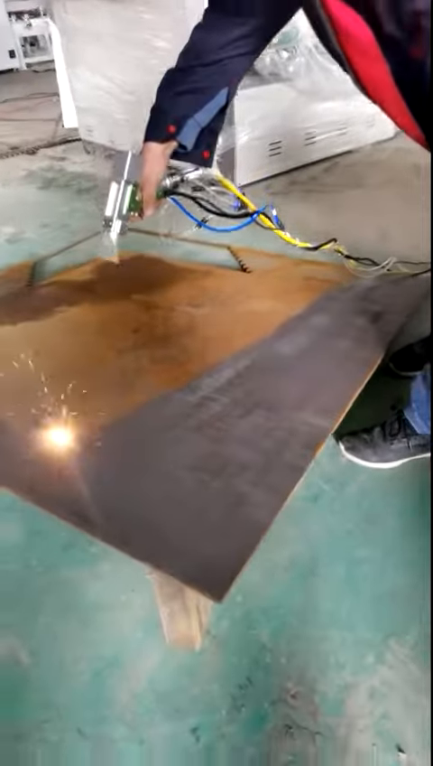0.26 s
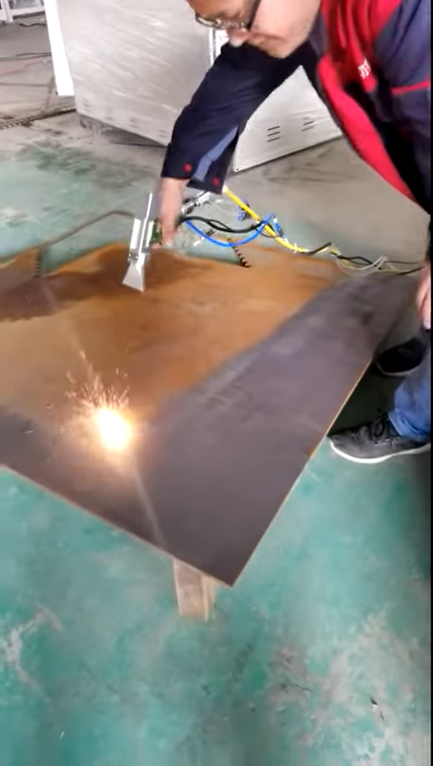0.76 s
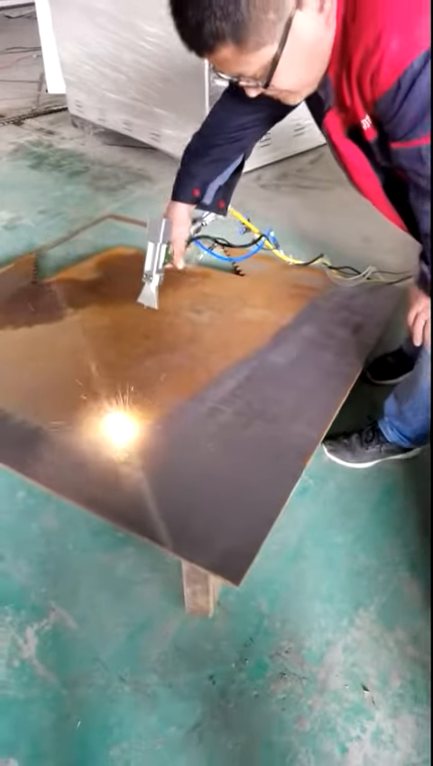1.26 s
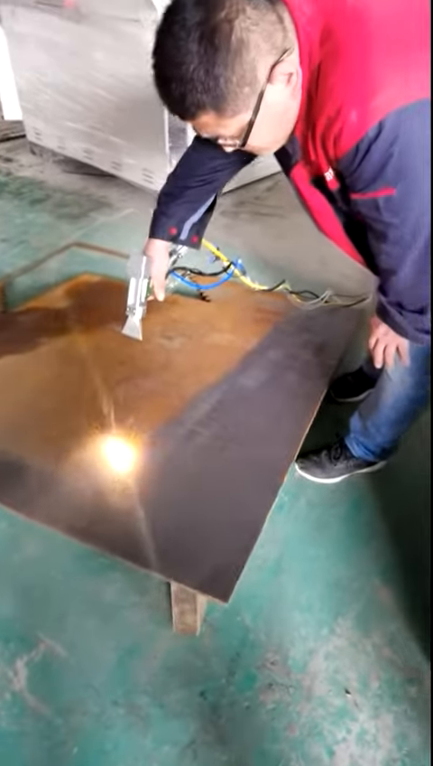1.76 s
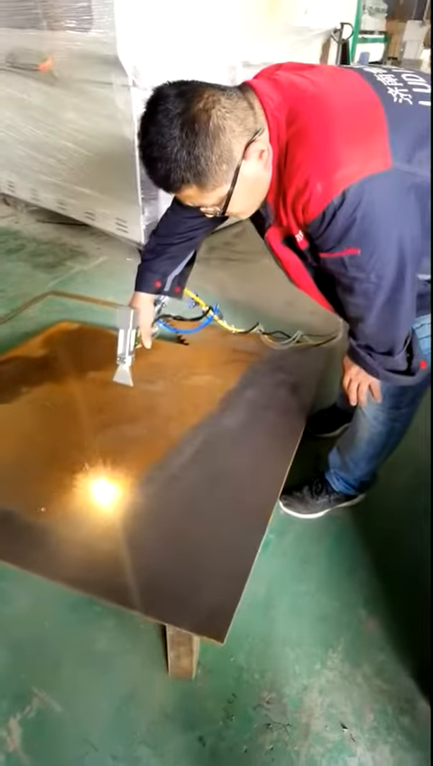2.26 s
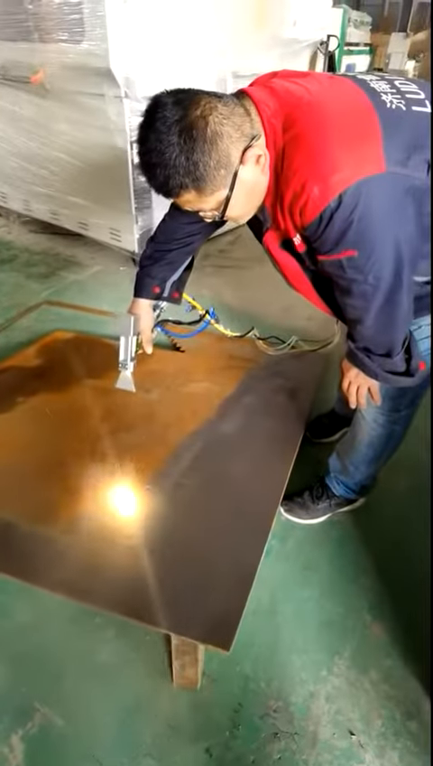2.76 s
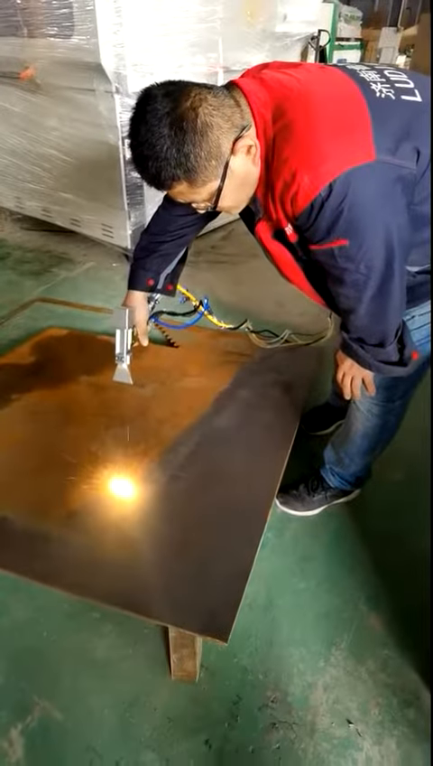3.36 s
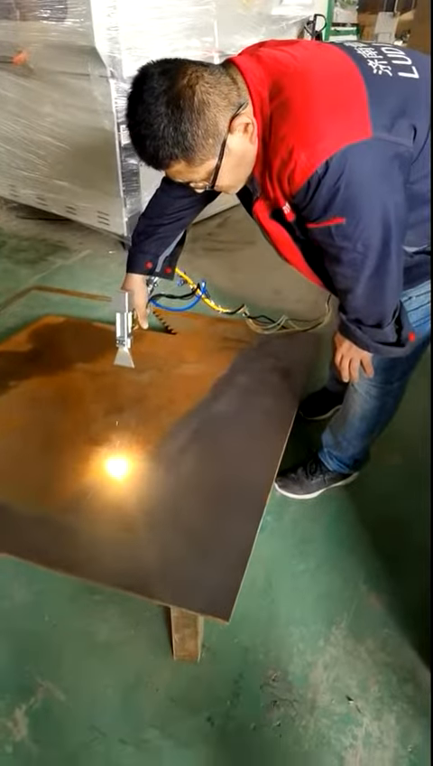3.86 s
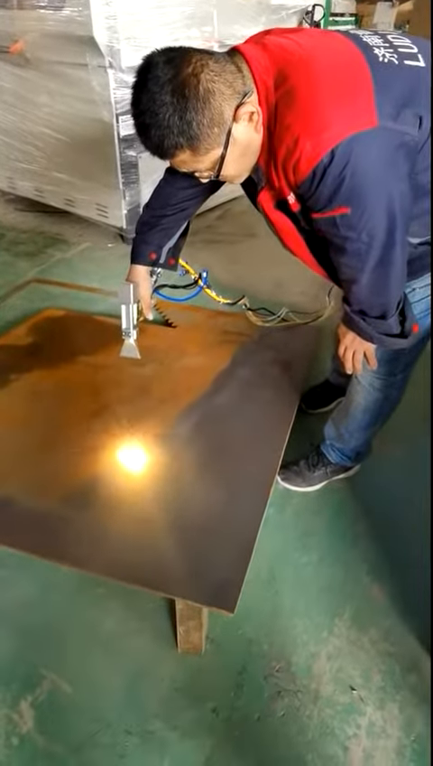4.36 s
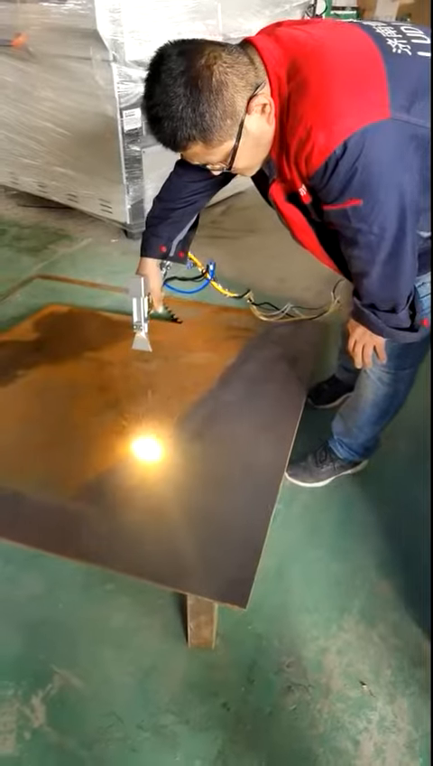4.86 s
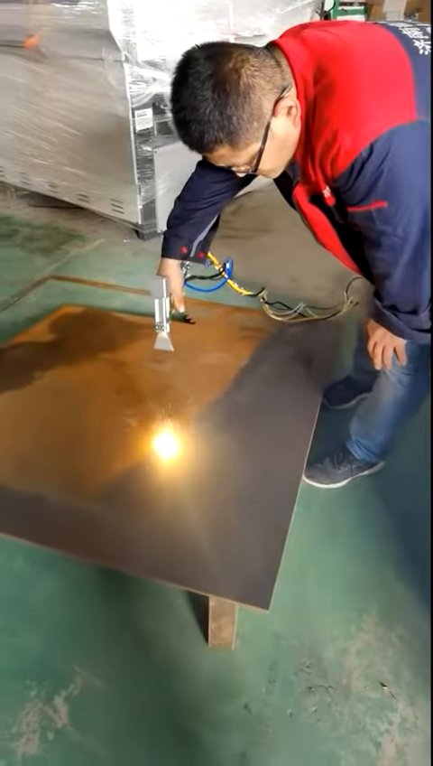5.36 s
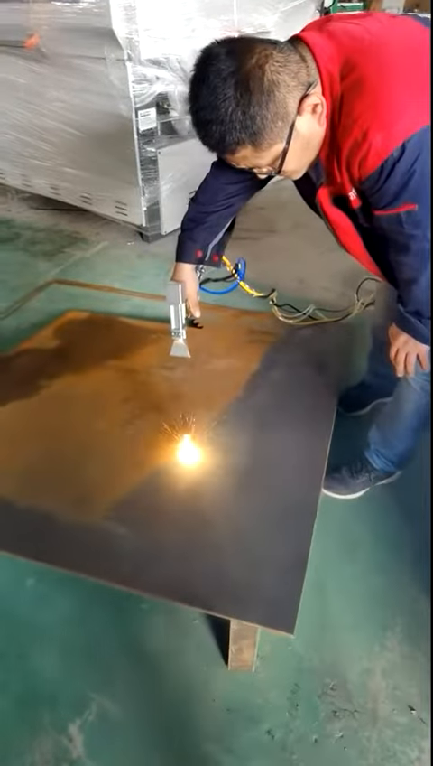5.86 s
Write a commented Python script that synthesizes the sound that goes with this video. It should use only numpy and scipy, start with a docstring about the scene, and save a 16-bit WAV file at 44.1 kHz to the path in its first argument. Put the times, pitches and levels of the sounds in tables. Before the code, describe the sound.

Close by, rust fizzes and hisses without pause as a handheld laser sweeps over a steel plate, along with a high, fast-fluttering whine. About halfway through, the sizzle eases slightly and the whine stands out more. A low power supply hum and the soft rumble of factory ventilation continue behind it, and a handful of quiet, dull knocks pass beneath the hiss.

```python
"""In a factory hall, a handheld laser cleaner strips rust from a steel plate.
The beam scans the plate about 2000 times a second, which whines; the spot also sweeps to and fro
about 25 times a second, so the whine warbles. Rust turning to vapour fizzes and hisses in drifting
bands. Below lie a mains hum, the hall's ventilation, patchy low noise and a few soft, dull knocks."""
import sys
import numpy as np
from scipy import signal
from scipy.fft import rfft, irfft, next_fast_len
from scipy.io import wavfile
from scipy.ndimage import uniform_filter1d

SR = 44100
rng = np.random.default_rng(int(sys.argv[2]) if len(sys.argv) > 2 else 0)


def bounce(signal):
    """Save signal as a 16-bit WAV file at the path given by the first command-line argument."""
    frames = np.transpose(np.atleast_2d(signal))
    limited = np.clip(frames, -1, 1)
    pcm = np.round(limited * 32767).astype(np.int16)
    wavfile.write(sys.argv[1], SR, pcm)


N = 269010
TIME = np.arange(N) / SR
# hiss is drawn on a grid of short moments (frames) and frequencies (bins)
FRAME_S = np.arange(N // 256 + 5) * 256 / SR
BIN_HZ = np.fft.rfftfreq(1024, 1 / SR)
SCAN_HZ, SWEEP_HZ, MAINS_HZ = 2000.85, 24.976, 99.95

# the sound sags at both turns of the sweep: time_s, far_depth, near_depth (both 0-1)
TURN_SAGS = [(0, .38, .28), (2, .43, .3), (3, .48, .22), (4.6, .52, .27), (5.1, .6, .2), (5.45, .78, .06),
             (6.1, .74, .07)]
# the whine's three main harmonics as gun and listener move: time_s, first_db, second_db, third_db
WHINE_LEVELS = [(0, -39.5, -40, -41), (.25, -41, -43, -33.5), (.5, -45, -34, -36), (.65, -37, -37.5, -40),
                (.85, -41, -32.5, -34), (1.08, -37.5, -30, -39), (1.22, -37, -35, -26),
                (1.45, -34.5, -35, -38), (1.6, -36, -39, -34), (1.8, -48, -28.5, -34), (2, -37, -36, -36),
                (2.22, -34, -36.5, -31.5), (2.42, -34.5, -42, -38), (2.55, -31.5, -38, -34),
                (2.75, -33.5, -35, -34), (2.95, -33, -35, -33), (3.15, -32.5, -30.5, -34),
                (3.7, -33, -31, -33), (4.15, -33.5, -36, -39.5), (4.47, -32.5, -35, -29.5),
                (4.6, -32.5, -36, -37), (4.78, -31.5, -34.5, -29.5), (4.92, -31, -36.5, -31.5),
                (5.05, -31.5, -34.5, -28.5), (5.25, -30.3, -33.5, -32.5), (5.45, -34, -32, -32.5),
                (5.65, -29.5, -29, -34.5), (5.76, -32, -35.5, -35.5), (5.97, -29, -30.5, -34),
                (6.1, -31, -43, -33)]
# faint high tones of the whine: harmonic, level_db
WHINE_OVERTONES = [(4, -57), (6, -60)]
# tone colour of the fizz: pitch_hz, loose_rust_db, bare_steel_db
FIZZ_COLOURS = [(705, -50, -45), (1010, -23, -3), (1370, -9.5, 0), (1700, -4, -1), (2260, -1, 2.5),
                (2530, -3.5, -2), (2850, 1, -2), (3100, -2.5, 0.5), (3490, -0.5, 1.5), (4370, 1.5, 3.5),
                (4700, -2, -4), (5150, -3.5, -1.5), (5600, 1.5, -1), (7250, -0.5, -6), (9100, -2.5, 0),
                (9600, -2.5, -11.5), (9600, 0, -9), (11110, -2, -3), (11700, -7.5, -11),
                (13660, -13.5, -19), (15000, -58, -40)]
# the fizz thins as loose rust burns off: time_s, level_db, treble_lift_db, bare_share (0-1)
FIZZ_CHANGES = [(0, -30.5, -1, 0.37), (.6, -30.5, -3.5, 0), (1.5, -30, -6, 0.1), (2.1, -32, -1.5, 0.3),
                (2.7, -32.5, -0.5, 0.36), (3.3, -34, -1, 0.98), (4.4, -34.5, 0.5, 0.9),
                (5.1, -34.5, -2, 0.9), (5.6, -33.5, 0.5, 0.77), (6, -30, -9, 0.1)]
# how hard the rust boils away, heard in the hiss bands: time_s, level_db
BAND_LEVELS = [(0, -28.5), (0.35, -30), (0.8, -25.5), (1.15, -25), (1.32, -27.5), (1.65, -25), (1.92, -25),
               (2.22, -25.5), (2.6, -29), (3.0, -28), (3.5, -34.5), (3.75, -30), (4.18, -32), (4.45, -31),
               (5.1, -32), (5.62, -34), (6.1, -30.5)]
# the bands glide as the gun settles, then drift with its aim: time_s, lower_hz, upper_hz
BAND_CENTRES = [(0, 3550, 6620), (.19, 3810, 6630), (.35, 3660, 6730), (.6, 3820, 6620), (1.1, 3810, 6530),
                (1.58, 3760, 6480), (1.86, 3840, 6620), (2.12, 3805, 6560), (2.75, 3880, 6730),
                (3.45, 3920, 6750), (3.64, 3750, 6470), (5.3, 3970, 6490), (5.6, 4070, 6530),
                (5.8, 3970, 6670), (6.1, 3800, 6600)]
# a well-focused beam gives narrow bands: time_s, width_factor, lower_bands_db
BEAM_FOCUS = [(0, 1, -5.5), (.35, 1.04, -1.5), (.8, 1.1, -3.5), (1.6, 0.96, -3), (1.92, 0.79, -8.5),
              (2.17, 1, -4.5), (2.6, 0.72, -8), (3.3, 0.9, -8), (4.4, 1.16, -14), (5.3, 1.5, -6),
              (6.1, 1.1, -7.5)]
# a narrow cut between upper band and whine (a boost if negative): time_s, pitch_hz, depth_db
BAND_NOTCH = [(0, 5860, -9), (.6, 6360, -4), (1.2, 6400, 15), (2.3, 6230, -5), (2.9, 6230, 7),
              (3.35, 6400, -3), (3.65, 5700, -3), (6.1, 5900, 14)]
# weak resonances that come and go, one list each: time_s, centre_hz, relative_db
WEAK_BANDS = [
    [(0, 4310, -5), (.2, 4200, -4.5), (.45, 3950, -3), (.8, 3900, -36)],
    [(0, 6330, -8), (.15, 6220, -7), (.35, 6060, -14), (.65, 5950, -40)],
    [(0, 7340, -14), (.45, 7200, -11), (.9, 7360, -22), (1.4, 7300, -17), (2.1, 7260, -13),
     (2.6, 7200, -27), (3.5, 7040, -3), (3.9, 7320, -18), (5.4, 7100, -14), (6.1, 7100, -3)],
    [(0, 8700, -22), (2.4, 8460, -21), (2.9, 8700, -15.5), (4.3, 8870, -14.5), (5.3, 9000, -28),
     (5.8, 9040, -11), (6.1, 8900, -8)],
]
# the hiss drops away for a split second: middle_s, half_length_s, depth_db
HISS_DIPS = [(0.482, 0.004, 20), (1.3, 0.022, 2), (1.955, .007, 5), (4.924, 0.008, 10), (5.568, 0.0065, 15),
             (6.012, .0055, 10), (6.057, 0.0055, 10)]
# hum of the laser's power supply: harmonic, level_db
HUM_HARMONICS = [(1, -40.5), (2, -56), (3, -79)]
# tone colour of the ventilation's rumble: pitch_hz, level_db
RUMBLE_COLOUR = [(15,5.5),(30,-6),(60,5),(110,6.5),(180,3),(250,-2.5),(350,-54),(800,-51)]
# tone colours of the low and the mid background noise: pitch_hz, level_db
LOW_COLOUR = [(100,-14),(200,-17),(290,4.5),(360,-3.5),(430,0),(520,1),(900,-15.5)]
MID_COLOUR = [(300,-41),(420,-54),(520,6.5),(640,13.5),(760,10),(900,1.5),(1150,12),(1700,-7),(4000,-37)]
# background noise with brief gaps that are shallower later on: time_s, mid_db, low_db, gap_depth_db
BACKGROUND_LEVELS = [(0, -47.5, -51.5, 15), (.8, -47.5, -64.5, 26), (1.15, -45, -44.5, 9),
                     (1.6, -45.5, -57, 23), (1.95, -45.5, -50.5, 14), (2.6, -45, -55, 25),
                     (3.3, -45, -48, 3), (4.1, -46, -49.5, 7), (5.1, -46.5, -47, 2), (5.75, -42, -47, 3),
                     (6.1, -46, -43, 6)]
# soft knocks under the sizzle: start_s, level_db
KNOCK_HITS = [(.478, -35.5), (1.948, -36), (2.313, -43), (2.946, -39), (4.928, -35)]
# the tones a knock rings with: pitch_hz, level_db, ring_s (time to fade by 60 dB)
KNOCK_TONES = [(115, -9, 0.047), (232, -3, 0.065), (335, -4.5, 0.073), (477, -12, 0.057), (820, -7, .04)]


def gain_of(db):
    """Turns decibels into a gain to multiply by."""
    return 10 ** (np.asarray(db) / 20)


def evened(x):
    """Scales a signal to an average strength (rms) of one."""
    return x / np.sqrt(np.mean(abs(x) ** 2) + 1e-20)


def follow(rows, at=TIME):
    """Joins a table's rows with straight lines: one curve for each column after time."""
    time_s, *columns = np.transpose(rows)
    return [np.interp(at, time_s, column) for column in columns]


def colour_gain(points, hz):
    """Gain at each frequency, read from (pitch_hz, level_db) points."""
    pitch_hz, level_db = np.transpose(points)
    return gain_of(np.interp(np.log(hz + 1), np.log(pitch_hz), level_db))


def filtered_noise(gain_at):
    """Steady noise, shaped by a function that gives each frequency a gain."""
    size = next_fast_len(N)
    hz = np.fft.rfftfreq(size, 1 / SR)
    return evened(irfft(rfft(rng.standard_normal(size)) * gain_at(hz), size)[:N])


def wander(rate_hz):
    """A random wobble, mostly slower than the given rate."""
    return filtered_noise(lambda hz: 1 / (1 + (hz / rate_hz) ** 2))


def patches(span_s, span_hz):
    """Random blotches over time and frequency."""
    field = rng.standard_normal((len(FRAME_S), len(BIN_HZ)))
    field = uniform_filter1d(field, max(1, round(span_s / FRAME_S[1])), axis=0)
    return evened(uniform_filter1d(field, max(1, round(span_hz / BIN_HZ[1])), axis=1))


def hiss(shape, patch_db):
    """Noise that follows a grid of gains (frames by bins), louder and softer in patches."""
    real, imag = rng.standard_normal((2, *shape.shape))
    spectra = (real + 1j * imag) * shape * gain_of(patch_db * patches(span_s=.25, span_hz=220))
    return evened(signal.istft(spectra.T, nperseg=1024, noverlap=768)[1][:N])


def sweep(lag_cycles=.14):
    """Where the spot is in its to-and-fro cycle, as an angle: zero at the far turn."""
    return 2 * np.pi * (SWEEP_HZ * TIME - lag_cycles)


def throb(share):
    """The level sags broadly at the sweep's far turn and briefly at the near turn."""
    far, near = follow(TURN_SAGS)
    place = np.cos(sweep())
    sag = far * np.exp(1.8 * (place - 1)) + near * np.exp(-8 * (place + 1))
    return evened(1 - share * sag)


def scan_tone(harmonic, swing_rad=.44, roughness=.23, rough_hz=60, waver_db=.75):
    """One tone of the whine; the sweeping spot moves nearer and farther, so it warbles."""
    travel = swing_rad * (np.cos(sweep()) + .3 * np.cos(2 * sweep()))
    # uneven rust roughens the higher tones most
    patchy = 1 + roughness * max(1, (harmonic / 2) ** 2) * (wander(rough_hz) + 1j * wander(rough_hz))
    angle = harmonic * (2 * np.pi * SCAN_HZ * TIME + travel) + 2 * np.pi * rng.random()
    tone = evened((patchy * np.exp(1j * angle)).real)
    return gain_of(waver_db * wander(4)) * tone * throb(1 if harmonic < 3 else .7)


def whine():
    """The scanning beam sings at whole multiples of its rate: three strong, two faint."""
    harmonics = [*enumerate(follow(WHINE_LEVELS), 1), *WHINE_OVERTONES]
    return sum(gain_of(db) * scan_tone(round(harmonic)) for harmonic, db in harmonics)


def fizz(flicker_db=1.93, grain_db=2.4):
    """Broad, grainy hiss, full over loose rust and hollower over bare steel; its treble flickers."""
    pitch_hz, *colours = np.transpose(FIZZ_COLOURS)
    loose_db, bare_db = (np.interp(np.log(BIN_HZ + 1), np.log(pitch_hz), db) for db in colours)
    _, lift_db, bare_share = follow(FIZZ_CHANGES, FRAME_S)
    treble = np.clip((BIN_HZ - 5000) / 5000, 0, 2)
    shape_db = loose_db + np.outer(bare_share, bare_db - loose_db)
    shape_db += np.outer(lift_db, np.minimum(treble, 1))
    shape_db += flicker_db * treble * patches(.045, 350)
    shape_db += grain_db * np.minimum(patches(.05, 170), 1.2)
    return gain_of(follow(FIZZ_CHANGES)[0]) * hiss(gain_of(shape_db), patch_db=1.86)


def hiss_band(centre_hz, core_hz, skirt_hz, skirt_db, notch_width_hz=44):
    """A resonance: a narrow core of hiss in a wide, softer skirt. It widens as focus is lost."""
    width = follow(BEAM_FOCUS, FRAME_S)[0]
    offset = (BIN_HZ - centre_hz[:, None]) / width[:, None]
    core = np.exp(-(offset / core_hz) ** 2)
    skirt = gain_of(skirt_db) ** 2 / (1 + (offset / skirt_hz) ** 2) ** 3
    power = core + skirt
    notch_hz, depth_db = (curve[:, None] for curve in follow(BAND_NOTCH, FRAME_S))
    notch = gain_of(-depth_db * np.exp(-((BIN_HZ - notch_hz) / notch_width_hz) ** 2))
    return hiss(notch * np.sqrt(power / power.sum(axis=1, keepdims=True)), patch_db=.9)


def weak_band(curve):
    """A weaker resonance that glides and fades on its own."""
    centre_hz, level_db = follow(curve, FRAME_S)[0], follow(curve)[1]
    return gain_of(level_db) * hiss_band(centre_hz, core_hz=88, skirt_hz=250, skirt_db=-8)


def rust_bands(sputter_db=.37):
    """Boiling rust hisses in two main bands, a faint low one and weak extras; each sputters."""
    lower_hz, upper_hz = follow(BAND_CENTRES, FRAME_S)
    balance_db = follow(BEAM_FOCUS)[1]
    faint = hiss_band(np.full(len(FRAME_S), 1378), core_hz=93, skirt_hz=200, skirt_db=-24)
    lower = hiss_band(lower_hz, core_hz=102, skirt_hz=420, skirt_db=-14)
    upper = hiss_band(upper_hz, core_hz=177, skirt_hz=720, skirt_db=-8.5)
    bands = [gain_of(balance_db - 15.5) * faint,
             gain_of(balance_db + .5) * lower * throb(.55),
             gain_of(.5) * upper * throb(.08),
             *map(weak_band, WEAK_BANDS)]
    sputtering = sum(band * gain_of(-sputter_db * wander(80)) for band in bands)
    return gain_of(follow(BAND_LEVELS)[0]) * sputtering


def sizzle(sputter_db=.47, band_dip_share=.6):
    """Bands and fizz together: the hiss sputters, and a few times drops away for a split second."""
    dip_db = sum(db * np.exp(-((TIME - middle_s) / half_s) ** 2) for middle_s, half_s, db in HISS_DIPS)
    bands = rust_bands() * gain_of(-band_dip_share * dip_db)
    broad = fizz() * throb(.11) * gain_of(-dip_db)
    return (bands + broad) * gain_of(sputter_db * wander(45))


def mains_hum(waver=.028):
    """The laser's power supply hums, wavering a little in level."""
    hum = sum(gain_of(db) * evened(np.sin(2 * np.pi * (round(k) * MAINS_HZ * TIME + rng.random())))
              for k, db in HUM_HARMONICS)
    return hum * (1 + waver * wander(3))


def ventilation(level_db=-50.5):
    """The hall's ventilation makes a steady, low rumble."""
    return gain_of(level_db) * filtered_noise(lambda hz: colour_gain(RUMBLE_COLOUR, hz))


def background_noise():
    """Soft low and mid noise with brief gaps that are shallower later on."""
    mid_db, low_db, gap_depth_db = follow(BACKGROUND_LEVELS)
    # the cap lets the low noise dip far but rise only a little
    low_gaps_db = np.minimum(gap_depth_db * wander(12), 2.5)
    low = gain_of(low_db + low_gaps_db) * filtered_noise(lambda hz: colour_gain(LOW_COLOUR, hz))
    # the mid noise turns thin and blotchy where the gaps are deep
    frame_depth_db = follow(BACKGROUND_LEVELS, FRAME_S)[2][:, None]
    mid_gaps_db = .55 * frame_depth_db * np.minimum(patches(.04, 220) - .3, .3)
    mid = gain_of(mid_db) * hiss(colour_gain(MID_COLOUR, BIN_HZ) * gain_of(mid_gaps_db), patch_db=.5)
    return low + mid


def knocks(attack_s=.0028):
    """Each knock rings a few low tones that die away quickly."""
    out = np.zeros(N)
    for start_s, level_db in KNOCK_HITS:
        start = round(start_s * SR)
        t = np.maximum(TIME[start:start + SR // 5] - start_s, 0)
        ring = sum(gain_of(db - 60 * t / ring_s) * np.sin(2 * np.pi * (hz * t + rng.random()))
                   for hz, db, ring_s in KNOCK_TONES)
        out[start:start + len(t)] += gain_of(level_db) * np.minimum(t / attack_s, 1) * ring
    return out


def scene():
    """The laser at work and the hall around it, in one channel."""
    return (whine() + sizzle() + mains_hum() + ventilation() + background_noise() + knocks())[None]


def record(dry):
    """Cuts away the very highest treble."""
    low_pass = signal.firwin(511, cutoff=15750, window=("kaiser", 9), fs=SR)
    return signal.oaconvolve(dry, low_pass[None], "same")


dry = scene()
out = record(dry)
bounce(out)
```